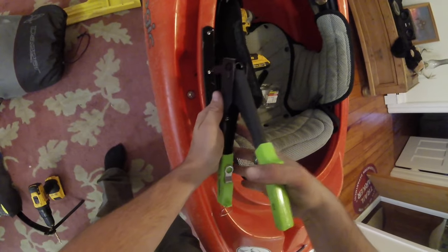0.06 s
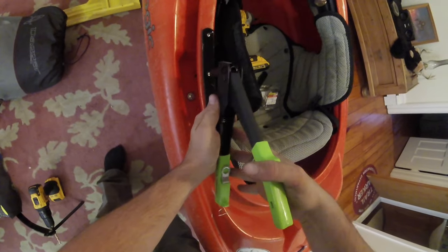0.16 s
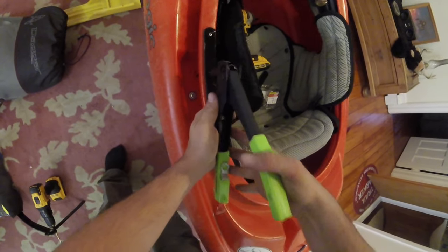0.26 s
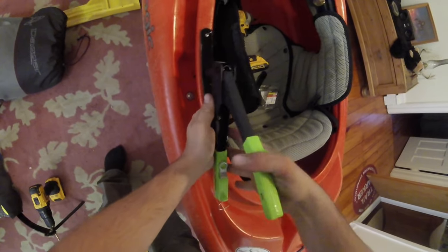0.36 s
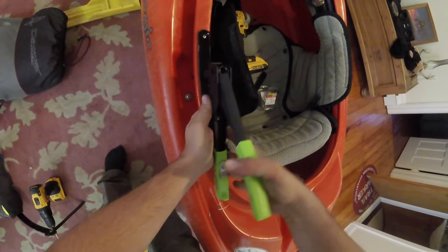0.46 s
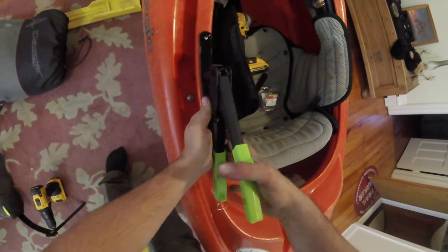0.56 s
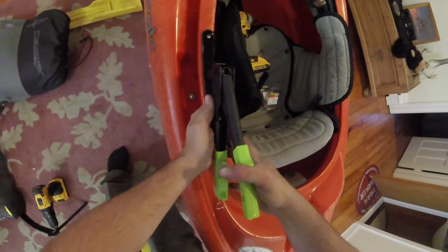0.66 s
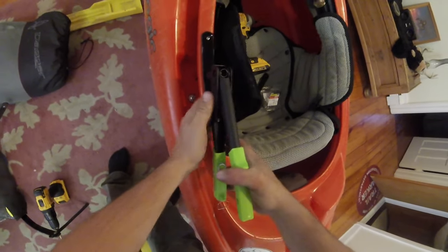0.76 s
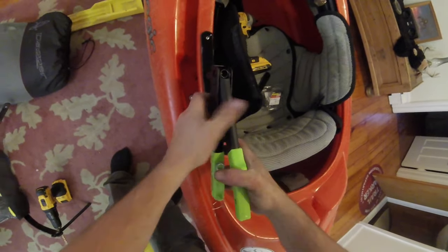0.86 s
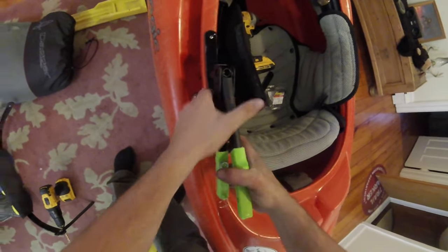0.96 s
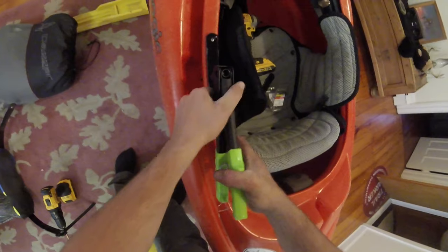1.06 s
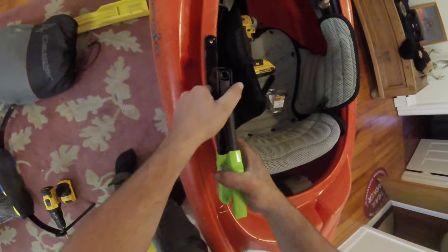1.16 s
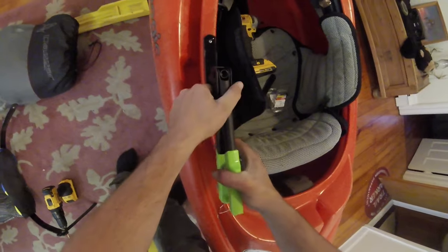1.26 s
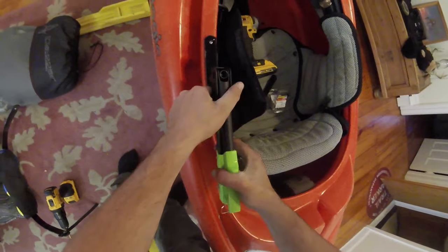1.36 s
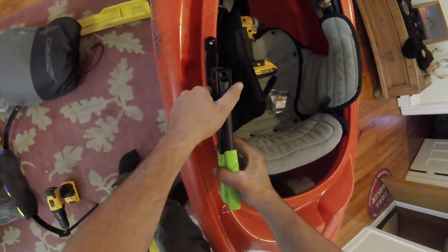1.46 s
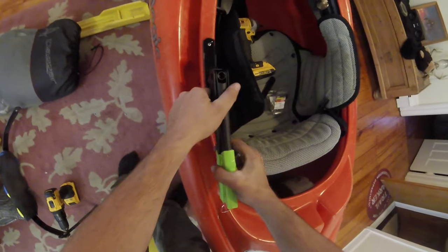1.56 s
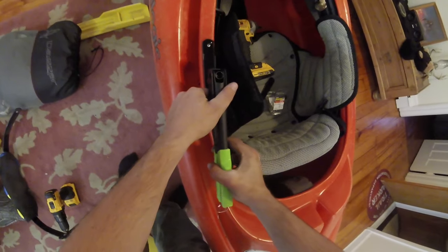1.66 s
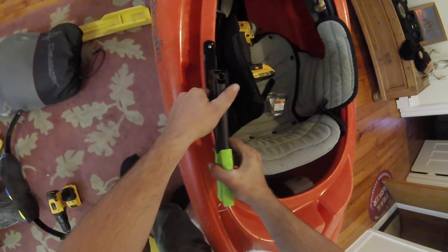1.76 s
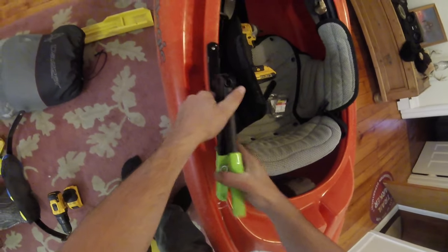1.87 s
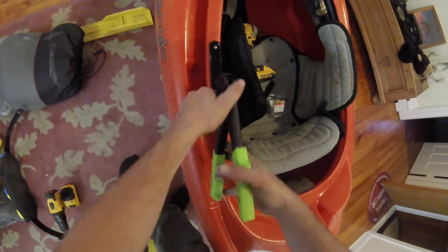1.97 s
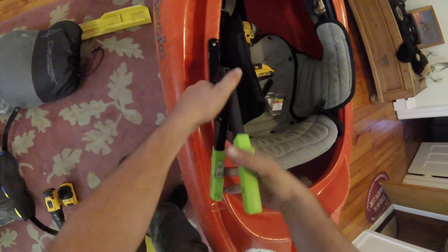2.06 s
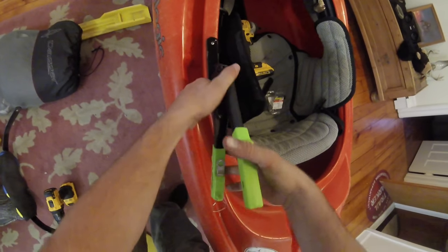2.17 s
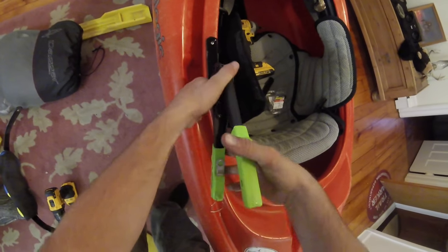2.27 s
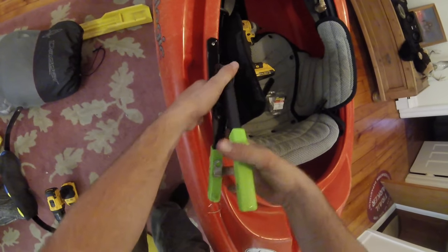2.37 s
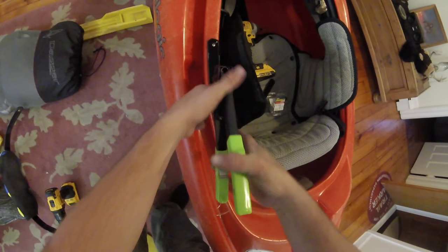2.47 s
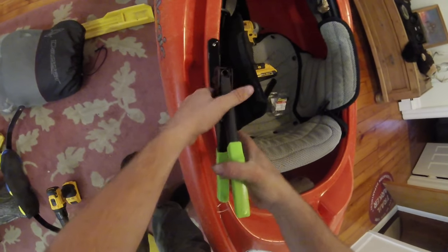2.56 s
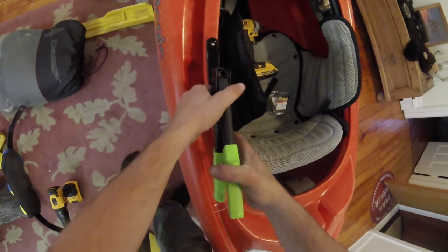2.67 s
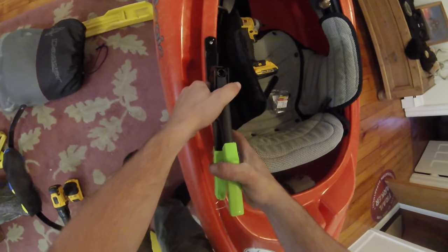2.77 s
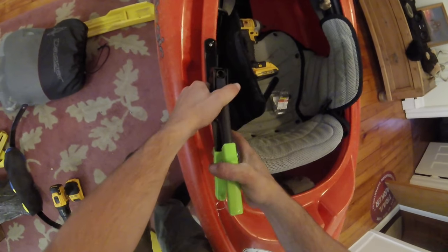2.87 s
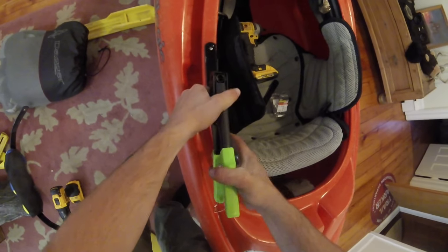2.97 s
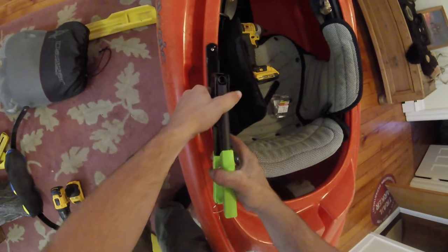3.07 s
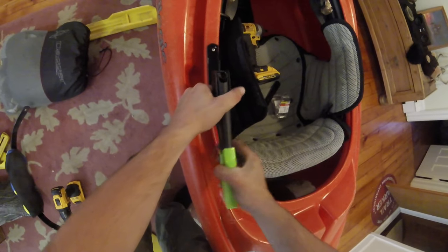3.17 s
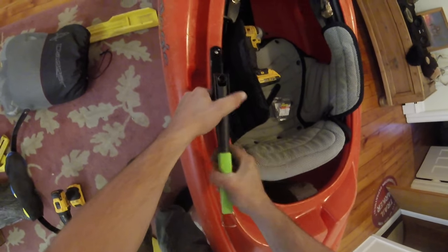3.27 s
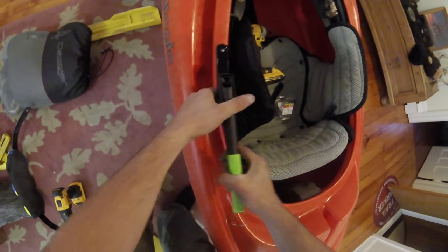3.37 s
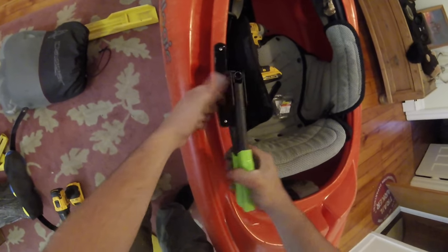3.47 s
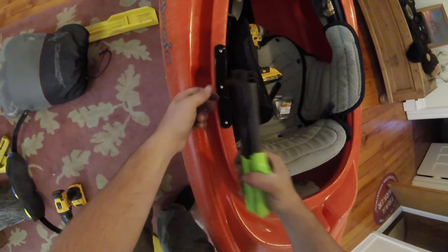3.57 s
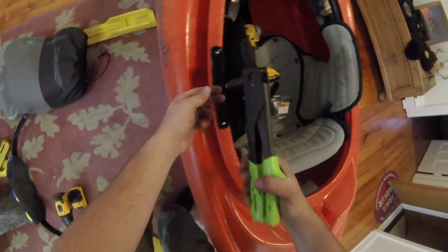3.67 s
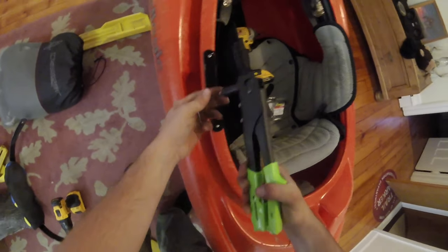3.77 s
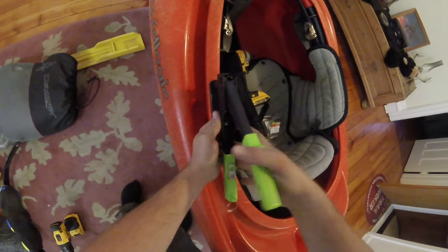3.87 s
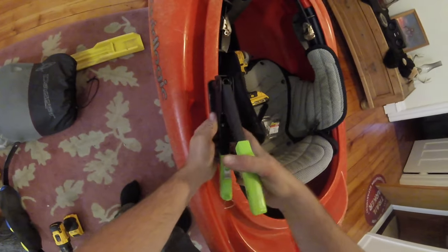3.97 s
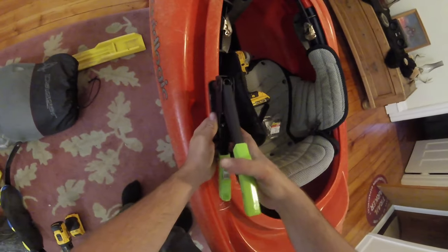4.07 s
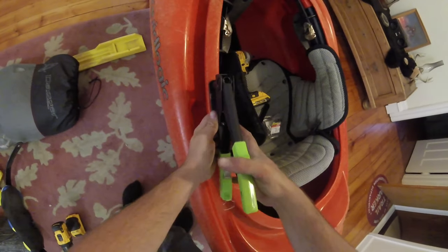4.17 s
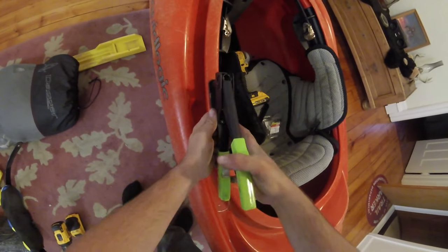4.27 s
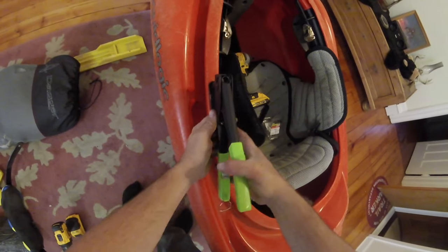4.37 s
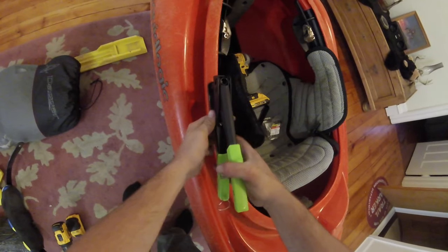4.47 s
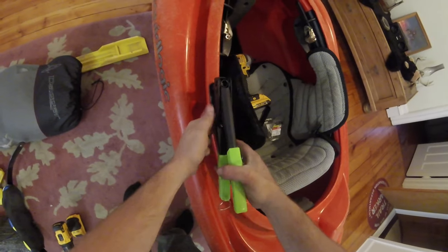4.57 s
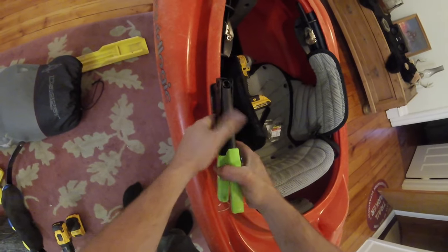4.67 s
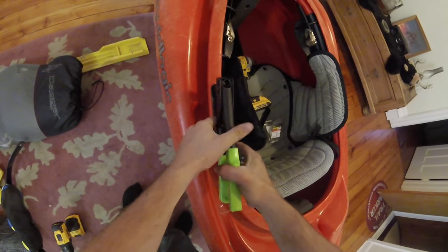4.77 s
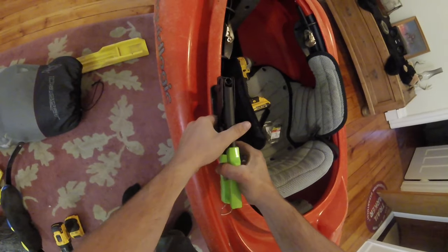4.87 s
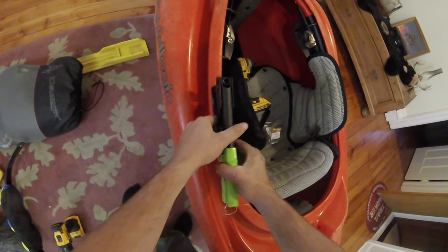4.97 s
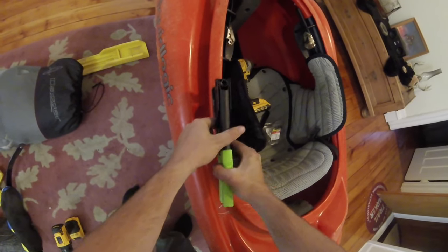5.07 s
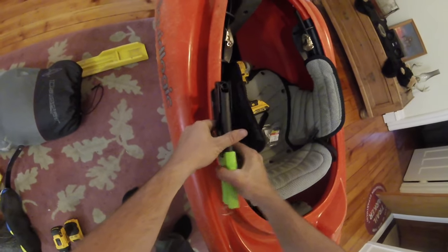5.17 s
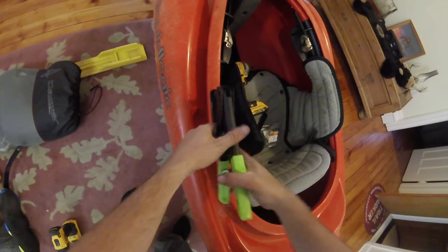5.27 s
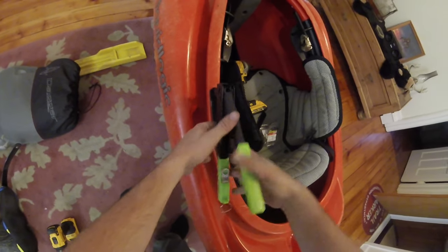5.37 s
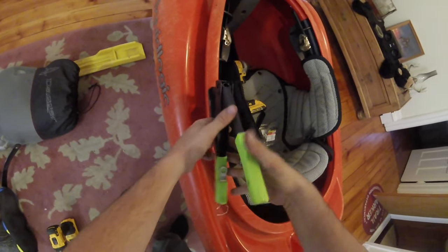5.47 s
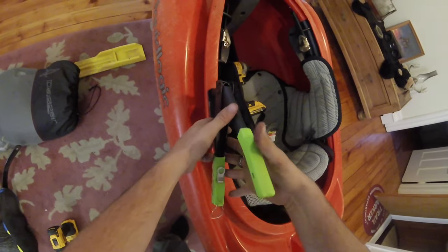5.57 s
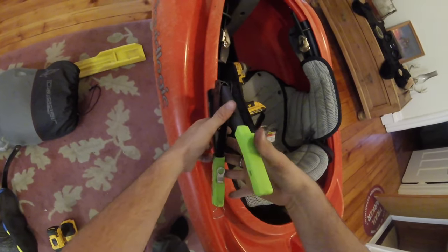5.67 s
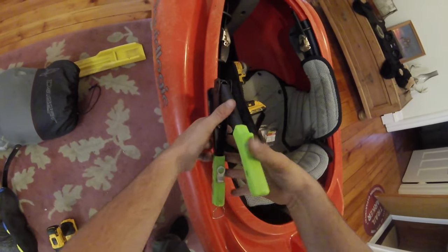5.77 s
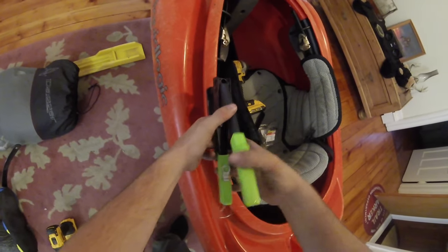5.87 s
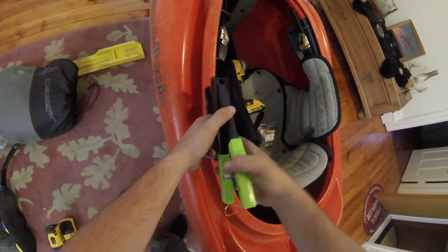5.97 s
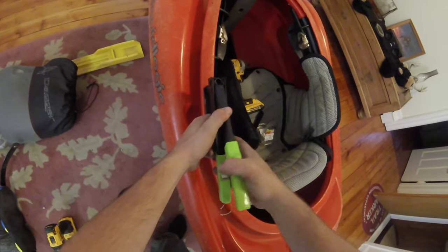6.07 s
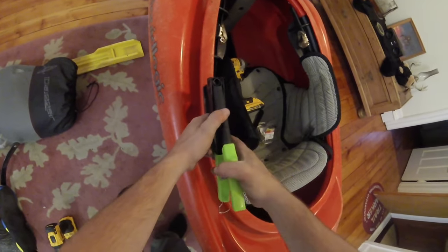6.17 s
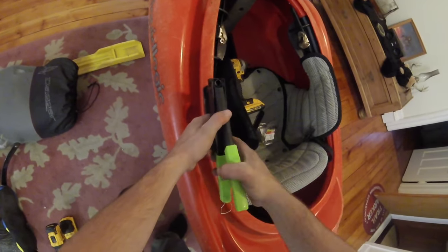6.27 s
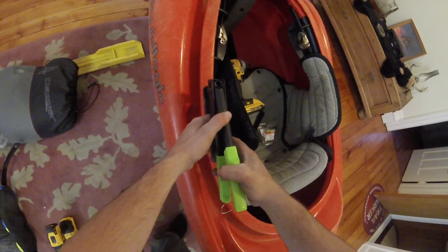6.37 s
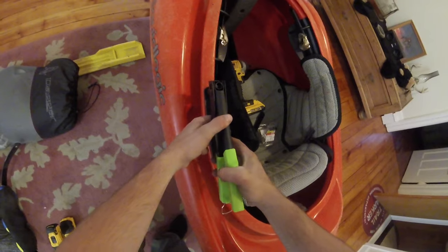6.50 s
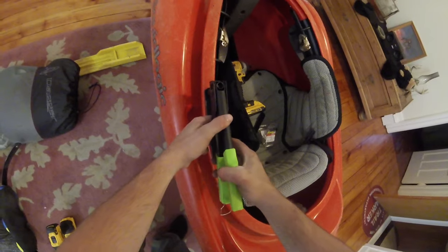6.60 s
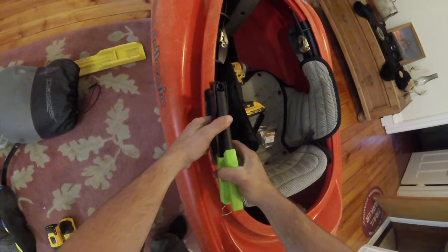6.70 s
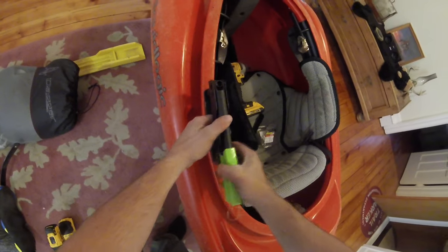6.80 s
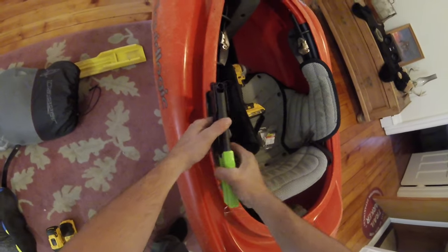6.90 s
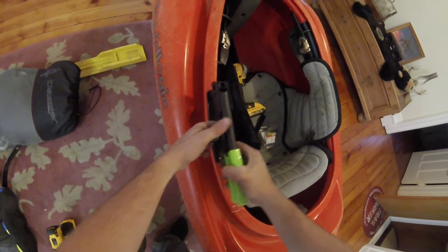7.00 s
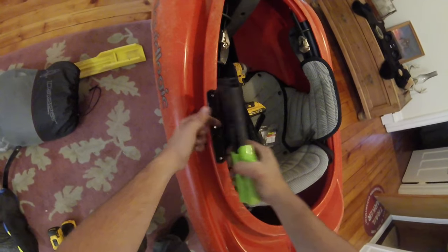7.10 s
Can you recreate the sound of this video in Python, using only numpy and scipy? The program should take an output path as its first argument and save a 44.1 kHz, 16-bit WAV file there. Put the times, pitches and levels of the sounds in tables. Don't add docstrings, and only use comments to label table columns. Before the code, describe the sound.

Heard from a small microphone on the worker's head: a firm early thud, sparse tool clicks, a cluster of light rattling taps, then a bright, hard crack as a rivet breaks, with hollow plastic resonance and a short room tail. Handling scuffs and more clicks follow, with a quieter stretch before a second similar crack. Faint hiss and rumble lie underneath, briefly sucked down by the snaps.

```python
import sys
import numpy as np
from scipy import signal
from scipy.fft import rfft, irfft, next_fast_len
from scipy.io import wavfile
from scipy.ndimage import uniform_filter1d, minimum_filter1d

SR = 44100
rng = np.random.default_rng(int(sys.argv[2]) if len(sys.argv) > 2 else 0)


def put_to_file(sound):
    columns = np.atleast_2d(sound).T
    safe = np.clip(columns, -1, 1)
    whole_steps = np.round(safe * 32767)
    wavfile.write(sys.argv[1], SR, whole_steps.astype(np.int16))


def decibels_to_gain(level_db):
    exponent = np.asarray(level_db, float) / 20
    return 10 ** exponent


N = 314874

# break in seconds, strength in dB, delay of the handle slam in seconds,
# lead of the recorder's duck in seconds, gain held afterwards in dB.
SNAPS = [
    (3.2176, -7.5, .0087, .0483, -11.5),
    (6.8564, -7.5, .0064, .0459, -15),
]
# resonance in Hz, level in dB, t60 in seconds.
BOOM_MODES = [(80.5, -11.5, 0.13), (95.5, -4, 0.43), (109.65, -2.5, 0.3), (123.94, -1, 0.26),
              (134.6, -1, 0.22), (179.7, -9.5, 0.37), (193.4, -6, 0.26), (238.6, -1, 0.11),
              (251.5, -3, 0.13), (300.3, -12.5, 0.16), (363, -8.5, 0.083)]


def at_hz(points, hz):
    points = np.array(points)
    return np.interp(np.log(hz), np.log(points[:, 0]), points[:, 1])


def rms_one(x):
    return x / np.sqrt(np.mean(x ** 2) + 1e-20)


def coloured(x, spectrum):
    size = next_fast_len(len(x))
    hz = np.maximum(np.arange(size // 2 + 1) * SR / size, 1)
    shaped = rfft(x, size) * decibels_to_gain(at_hz(spectrum, hz))
    return rms_one(irfft(shaped, size)[:len(x)])


def drift(rate_hz):
    r = np.exp(-2 * np.pi * rate_hz / SR)
    wander = signal.lfilter([1], [1, -2 * r, r * r], rng.standard_normal(N + SR))
    return rms_one(wander[SR:])


def ring(push, hz, t60):
    r = decibels_to_gain(-60 / (t60 * SR))
    w = 2 * np.pi * hz / SR
    return signal.lfilter([0, np.sin(w)], [1, -2 * r * np.cos(w), r * r], push + 1e-18)


def grains(per_s, clump_db):
    slips = (rng.random(N) < per_s / SR) * rng.standard_normal(N)
    return slips * decibels_to_gain(clump_db * drift(40))


def hiss():
    # frequency in Hz, level in dB per Hz.
    spectrum = [(100, -4.5), (300, -3), (700, -2.5), (2000, -4.5), (3300, -9.5), (4400, -20.5),
                (5600, -12.5), (6100, -7.5), (6550, 3.5), (7100, -4), (9200, -8.5), (10400, -16.5),
                (12000, -12), (14500, -29.5)]
    level_db = -59.5 + 0.5 * drift(3.5)
    return decibels_to_gain(level_db) * coloured(rng.standard_normal(N), spectrum)


def grip():
    # middle in seconds, length in seconds, pressure in dB, skin in dB and hull weight in dB re pressure.
    strokes = [(0.021, 0.18, -59.5, 2.5, 2), (0.177, 0.2, -52, -1.5, 10), (0.188, 0.029, -61, 7, 5),
               (.32, 0.098, -46, -4, -1), (0.382, 0.22, -56, -12, 3), (0.746, 0.18, -71, 5, 25.5),
               (1.033, 0.45, -65, 2, 11), (1.302, 0.18, -66.5, -10, 12), (1.94, 0.1, -56, 3, 9),
               (2.187, 0.15, -82, -3, 15), (2.505, 0.48, -56.5, 7, 11), (2.787, 0.24, -67, 7.5, 9),
               (3.278, .1, -57, 7, 38), (3.45, 0.37, -54.5, -2, 5), (3.76, 0.28, -53, 2, -7),
               (3.911, 0.11, -45, -10.5, 7.5), (3.985, 0.17, -55, -3, 16), (4.192, 0.13, -52, -17, 7.5),
               (4.387, 0.39, -72.5, -26, 20), (5.351, 0.15, -47.5, -3.5, 9.5), (5.564, 0.36, -63, -4, 7),
               (5.94, 0.35, -70, -15, 20.5), (6.919, 0.14, -58, 2, 29), (7.05, 0.34, -49, 0, -1)]
    resting_db = np.array([[-69], [-72.5], [-55.5]])
    t = np.arange(0, N, 64) / SR
    gains = decibels_to_gain(resting_db)
    for s, length, db, skin_db, weight_db in strokes:
        bell = np.exp(-2 * ((t - s) / (length / 2)) ** 2)
        gains = gains + decibels_to_gain(db + np.array([[0], [skin_db], [weight_db]])) * bell
    return [np.interp(np.arange(N) / SR, t, row) for row in gains]


def hands():
    # frequency in Hz, level in dB per Hz.
    rumble_spectrum = [(15, 9), (25, 21), (40, 5.5), (60, 7.5), (90, -6), (130, -44)]
    scuff_spectrum = [(200, -22), (350, 1.5), (600, 1), (1000, -4), (1600, -8.5), (2600, -13), (5000, -46)]
    rub_spectrum = [(800, -34.5), (1600, -4), (2600, -3), (3600, -5), (4300, -4.5), (5200, -0.5),
                    (6500, 3.5), (7500, -5), (10000, -29.5)]
    scuff_gain, rub_gain, drum_gain = grip()

    early_db, late_db, step_s = -53, -43.5, 3.8685
    rumble_db = np.where(np.arange(N) < step_s * SR, early_db, late_db) + 1 * drift(2.5)
    rumble = coloured(rng.standard_normal(N), rumble_spectrum) * decibels_to_gain(rumble_db + 6)

    stir = rng.standard_normal(N) * decibels_to_gain(3.4 * drift(15))
    drum = rms_one(sum(decibels_to_gain(db) * ring(stir, hz, 0.27 * t60) for hz, db, t60 in BOOM_MODES))
    scuff = coloured(grains(1400, clump_db=2.0), scuff_spectrum) * decibels_to_gain(-1.5) * scuff_gain
    rub = coloured(grains(4500, clump_db=-1.5), rub_spectrum) * decibels_to_gain(-6.5) * rub_gain
    return rumble + drum * decibels_to_gain(1.0) * drum_gain + scuff + rub


def ducking():
    open_db, creep_db_per_s, duck_db, after_db = -1.5, 0.18, -25.5, -2.5
    hold_s = 0.6502
    t = np.arange(N) / SR
    gain_db = open_db + creep_db_per_s * t
    for s, _, _, lead, held_db in SNAPS:
        after = np.interp(t - s, [-lead, 0, hold_s, hold_s + 0.003], [duck_db, held_db, held_db, after_db])
        gain_db = np.where(t > s - lead, after, gain_db)
    return uniform_filter1d(gain_db, size=130)


def room(x):
    # frequency in Hz, level in dB per Hz.
    echo_spectrum = [(150, -6.5), (470, 10.5), (950, 6), (1750, 0), (2300, 6.5), (3200, -2), (4200, -12),
                     (5300, -3), (6400, -1), (7700, -3.5), (9500, 6), (11500, -15)]
    # frequency in Hz, t60 in seconds.
    echo_t60 = [(200, 0.31), (700, 0.33), (2000, 0.45), (3200, 0.43), (4200, 0.3), (6400, 0.35),
                (7700, .24), (11500, .12)]
    edges_hz = [100, 140, 200, 280, 400, 560, 800, 1100, 1500, 2000, 2700, 3700, 4800, 5900, 7000, 8500,
                10500, 12500]
    out = 0
    white = rng.standard_normal((2, N))
    fill = np.exp(-1 / (0.00033 * SR))
    for k, (low, high) in enumerate(zip(edges_hz, edges_hz[1:])):
        band = signal.butter(3, [low, high], "band", fs=SR, output="sos")
        heard, noise = signal.sosfilt(band, [x, white[k % 2]])
        hz = np.sqrt(low * high)
        fade = decibels_to_gain(-120 / (at_hz(echo_t60, hz) * SR))
        build_and_fade = np.convolve([1, -fade], [1, -fill])
        energy = signal.lfilter([(1 - fill) / SR], build_and_fade, heard ** 2)
        out = out + decibels_to_gain(at_hz(echo_spectrum, hz)) * np.sqrt(np.abs(energy)) * rms_one(noise)
    return out


def pings():
    # start in seconds, pitch in Hz, level in dB, t60 in seconds.
    parts = [(3.219, 6240, -9.5, 0.015), (3.2267, 5770, -6, 0.019), (6.8585, 6410, -6.5, 0.025),
             (6.8642, 5600, -15.5, 0.011), (3.2287, 1046, -23, 0.034), (.3425, 1030, -24, 0.034),
             (0.547, 1550, -44.5, 0.04), (0.659, 1650, -51.5, 0.044), (1.718, 1910, -40, 0.022),
             (4.161, 4040, -51, 0.071), (4.609, 1595, -53, 0.061)]
    notes = sum(decibels_to_gain(db) * ring(np.arange(N) == round(s * SR), hz, t60) for s, hz, db, t60 in parts)
    return signal.lfilter([.25, .5, .25], [1], notes)


def struck(modes, times, levels_db, spread_db, contact_s):
    at = np.round(times * SR).astype(int)
    out = np.zeros(N)
    luck = rng.standard_normal((len(at), len(modes), 2))
    t = np.arange(SR // 10) / SR
    contact = t * np.exp(-t / contact_s)
    for k, (hz, mode_db, t60) in enumerate(modes):
        clicks = np.zeros(N)
        clicks[at] = decibels_to_gain(levels_db + mode_db + spread_db * luck[:, k, 0]) * np.sign(luck[:, k, 1])
        push = contact * np.cos(2 * np.pi * hz * t)
        pushed = signal.oaconvolve(clicks, 2 * push / np.sum(contact))[:N]
        out += ring(pushed, hz, t60)
    return out


def thuds():
    # start in seconds, peak in dB.
    hits = [(0.116, -39.5), (0.18, -27.5), (0.344, -9), (1.702, -33), (1.82, -34.5), (1.896, -31),
            (1.919, -25.5), (1.957, -31), (1.973, -19.5), (1.998, -29), (2.271, -47), (3.522, -43.5),
            (3.586, -52), (3.607, -41.5), (3.681, -44), (3.697, -42), (3.709, -35.5), (3.869, -40),
            (3.941, -26), (4.161, -40), (5.07, -41), (5.288, -31), (5.308, -24), (5.323, -30), (5.339, -27),
            (5.376, -27.5), (5.589, -52)]
    # deck resonance in Hz, level in dB, t60 in seconds.
    deck_modes = [(188, 0, 0.048), (240, .5, 0.12), (320, -3, 0.029), (356, -8, 0.027), (435, -5.5, 0.03)]
    s, db = np.transpose(hits)
    return struck(deck_modes, s, db - 5.5, spread_db=1.5, contact_s=0.00036)


def crackle(modes, times, levels_db, burst_s, cycles):
    clicks = np.full(N, 1e-18)
    clicks[np.round(times * SR).astype(int)] = decibels_to_gain(levels_db)
    fade = np.exp(-1 / (burst_s * SR))
    burst = signal.lfilter([1], [1, -fade], clicks) * rng.choice([-1, 1], N) * np.sqrt(1 - fade ** 2)
    direct, around = 0, 0
    for k, (hz, db) in enumerate(modes):
        gain = (-1) ** k * decibels_to_gain(db)
        direct = direct + gain * ring(burst, hz, cycles / hz)
        around = around + gain * ring(clicks, hz, cycles / hz / 2.35)
    return np.array([direct, around])


def snap_contacts():
    # steel, rim, wall and boom level, all in dB re the snap's strength.
    snap_parts = [
        (4.7, -15.5, -21, -16.5),
        (-1, -20, -20.5, -21),
        (-5.5, -16, -23, -15.5),
        (-9.5, -17, -20.5, -14),
    ]
    recoil_s, rebound_s = 0.0017, 0.0019
    rows = []
    for s, db, slam, _, _ in SNAPS:
        for lag, part in zip([0, recoil_s, slam, slam + rebound_s], snap_parts):
            rows.append((s + lag, *(db + np.array(part))))
    return np.array(rows)


def small_contacts():
    # start in seconds, strength in dB, hardness in dB, weight in dB.
    taps = [(0.1865, -50, 3.5, 18.5), (0.195, -59.5, 6, 17), (0.3405, -25, -7.5, 8), (.5421, -52, -5, 10),
            (0.6598, -51, -14, 12.5), (0.8097, -58, -5, 5), (.8984, -54.5, -19, -11), (1.478, -75, 17, 2),
            (1.702, -51, -14, 16), (1.8197, -53, -3, 14.5), (1.8949, -45.5, -6, 3), (1.9048, -42, -11, 3),
            (1.917, -36, -11, 11), (1.9523, -28.5, -5.5, 0.5), (1.999, -46.5, -9, 17),
            (2.045, -50.5, -6, 13.5), (2.1102, -62, 11, 22.5), (2.377, -52.5, -2, 2), (2.596, -63, 0, -14),
            (2.6538, -53.5, -9, 2), (3.712, -58, -17, -1), (4.1628, -42, -8.5, 9), (5.29, -33.5, -5.5, -2),
            (5.3087, -47, -15, 17), (5.3247, -48, -10, 11), (5.34, -35, -7, -2), (5.3551, -40.5, -7, 8),
            (5.3753, -49.5, -18, 15), (5.5911, -40, -17, 9), (5.881, -56, -8, 16)]
    knocks = [(0.1176, -58, -13, 22.5), (0.1794, -40, -11, 4), (.3134, -41.5, -9, 10.5),
              (0.517, -49.5, -19, 16), (1.7187, -49.5, -11, 3), (1.9725, -38, -7.5, 9.5),
              (2.2748, -50, -7, 0), (2.8288, -69, -6, 20.5), (3.609, -55, -17, 1), (3.6834, -60, -21, 1),
              (3.6981, -50, -20, 0), (3.8718, -56.5, -15, 19.5), (3.886, -36, -15, 5),
              (3.914, -49, -14, 11), (3.951, -28.5, -33, -9), (3.9398, -25.5, -35, 9.5),
              (4.491, -57, -12, 8), (5.07, -45, -7.5, 16), (0.3426, -21.5, -8, -7),
              (5.9373, -72.5, -8, 36.5)]
    rows = [(s, db + hard, db, db - 7.5, db + weight) for s, db, hard, weight in taps]
    rows += [(s, db + hard, db + hard, db, db + weight) for s, db, hard, weight in knocks]
    return np.array(rows)


def blows():
    # frequency in Hz, level in dB.
    steel_modes = [(2700, -17.5), (3300, -10), (3900, -11.5), (4500, -6), (5000, -2), (5600, 5.5),
                   (6000, 8), (6400, 7.5), (6900, 0.5), (7600, -11), (8600, -19.5), (9800, -24),
                   (11200, -31)]
    jaw_modes = [(3900, -6), (4500, -1), (5100, 6.5), (5700, 10.5), (6400, 10.5), (7100, 6), (8000, 4),
                 (9000, -5), (10200, -31.5), (11600, -14.5), (13000, -28)]
    rim_modes = [(1330, 3.5), (1640, 5.5), (1920, 2), (2250, 2), (2600, 1), (3000, -0.5), (3400, -0.5)]
    wall_modes = [(430, 0), (520, 5), (630, 0.5), (760, -4), (900, 7), (1050, 11), (1180, 4.5)]
    snaps, small = snap_contacts(), small_contacts()
    s, _, rim_db, wall_db, boom_db = np.vstack([snaps, small]).T
    steel = crackle(steel_modes, snaps[:, 0], snaps[:, 1] - 4, burst_s=0.000005, cycles=35)
    jaws = crackle(jaw_modes, small[:, 0], small[:, 1], burst_s=0.001, cycles=24)
    rim = crackle(rim_modes, s, rim_db + 2, burst_s=0.002, cycles=14)
    wall = crackle(wall_modes, s, wall_db, burst_s=0.002, cycles=11)
    boom = struck(BOOM_MODES, s, boom_db - 4.5, spread_db=2.0, contact_s=0.0041)
    steel = signal.sosfilt(signal.butter(2, 9500, fs=SR, output="sos"), steel)
    return steel + jaws + rim + wall, boom + thuds()


def scene():
    (direct, around), boom = blows()
    ringing = pings()
    wet = decibels_to_gain(18.0) * room(around + decibels_to_gain(-12.5) * boom)
    background = decibels_to_gain(ducking()) * (hands() + hiss())
    return (direct + boom + ringing + wet + background)[None]


def band_limit(x):
    return signal.sosfilt(signal.butter(12, 14980, fs=SR, output="sos"), x)


def record(dry):
    room_left = np.minimum(1, 0.72 / (np.abs(dry) + 1e-9))
    held = dry * uniform_filter1d(minimum_filter1d(room_left, size=31), size=31)
    top_cut = signal.cheby2(10, 60, 15100, fs=SR, output="sos")
    return band_limit(signal.sosfilt(top_cut, held))


dry = scene()
out = record(dry)
put_to_file(out)
```